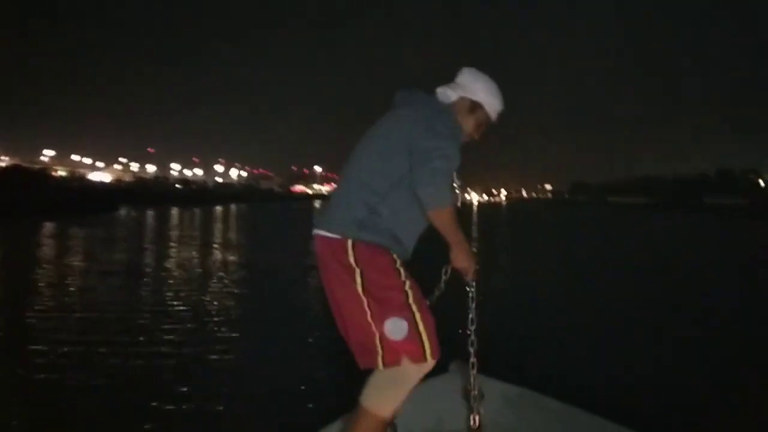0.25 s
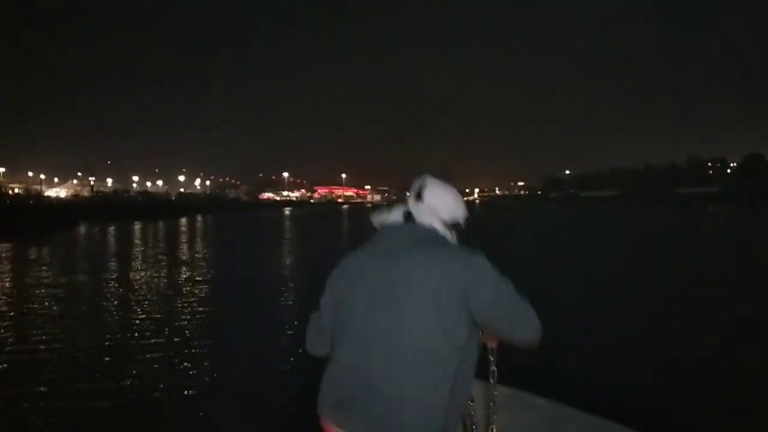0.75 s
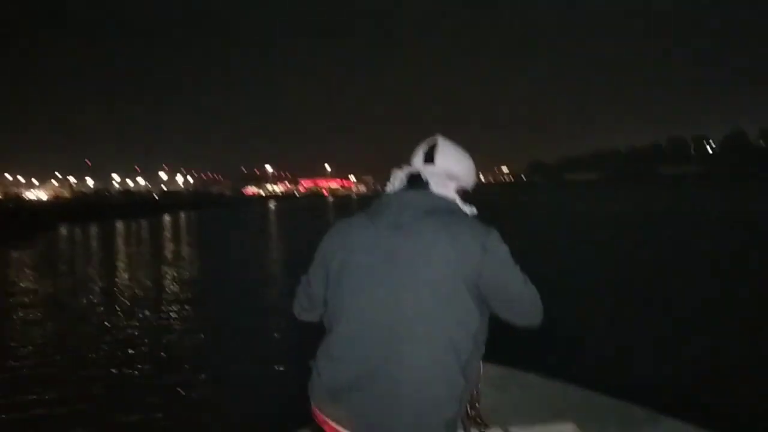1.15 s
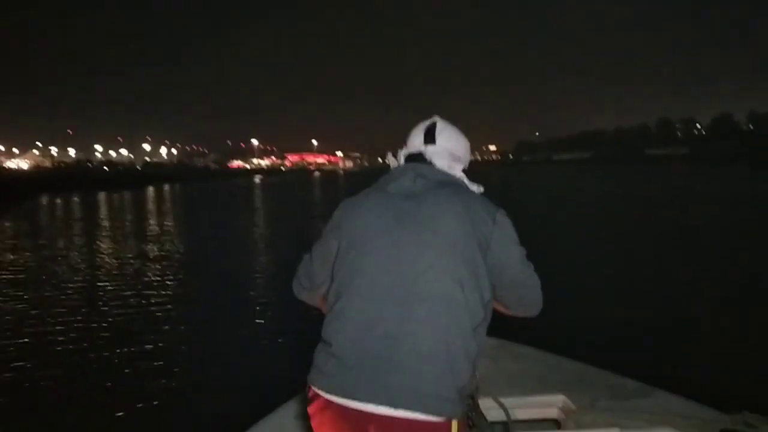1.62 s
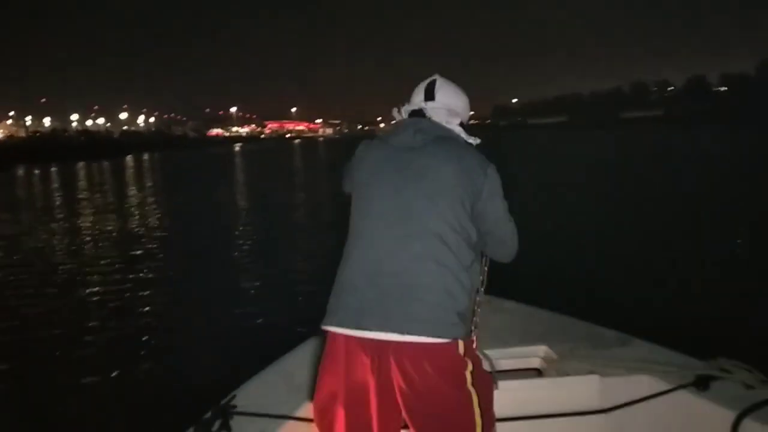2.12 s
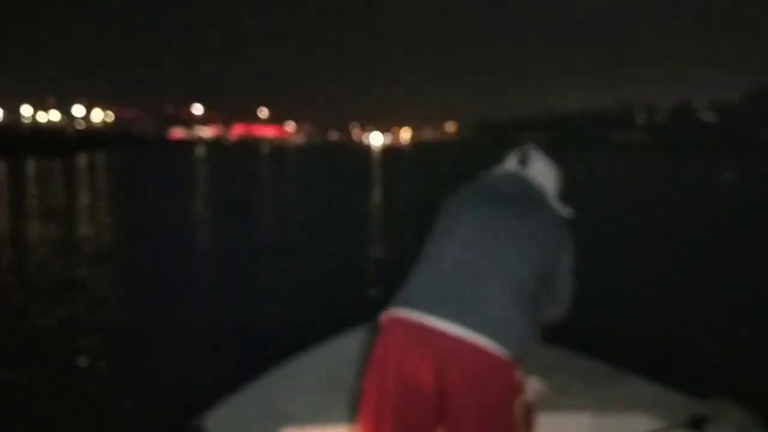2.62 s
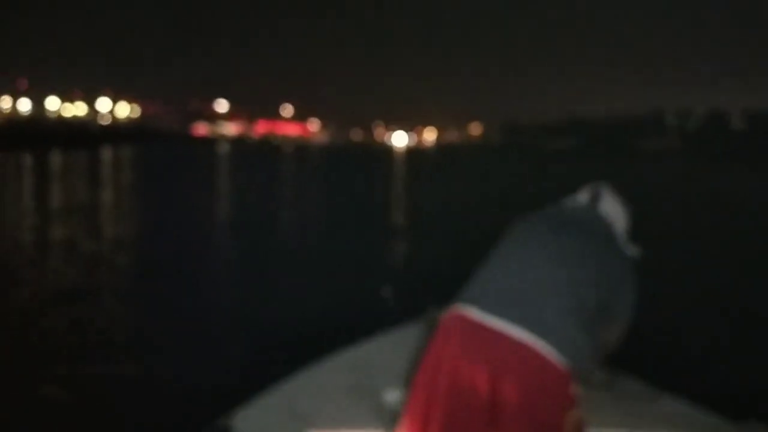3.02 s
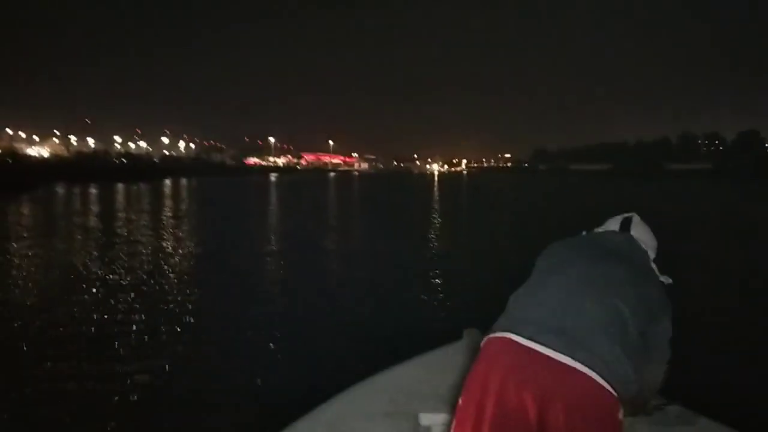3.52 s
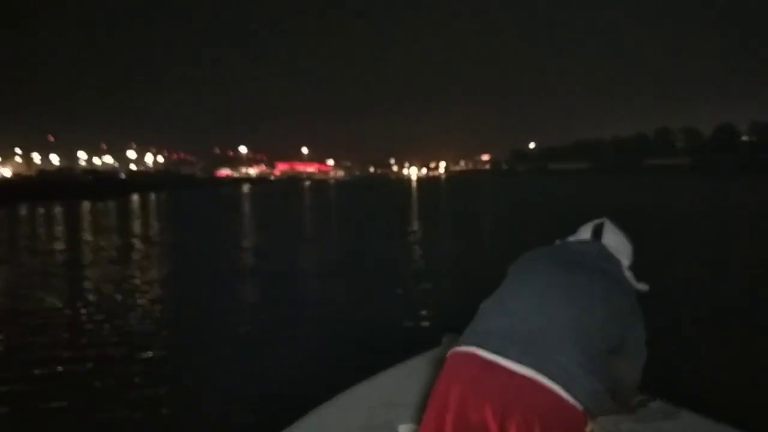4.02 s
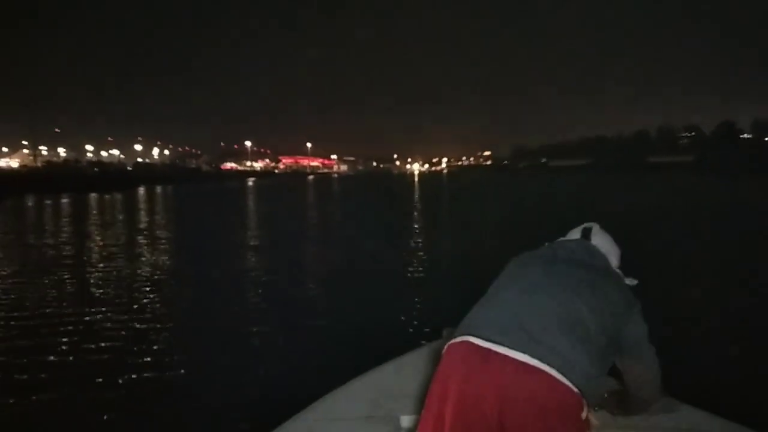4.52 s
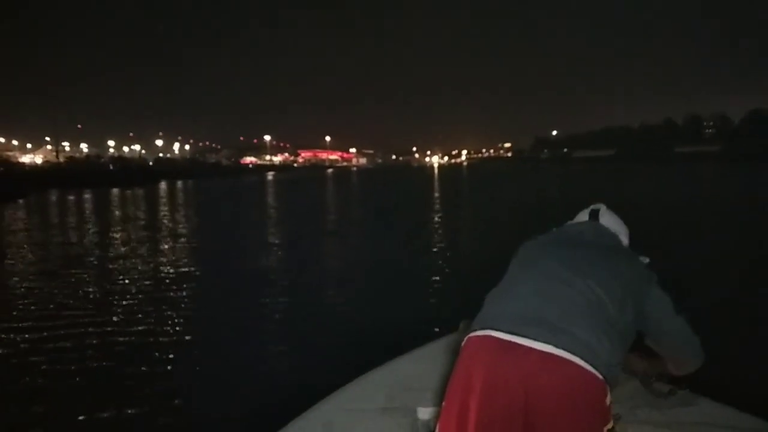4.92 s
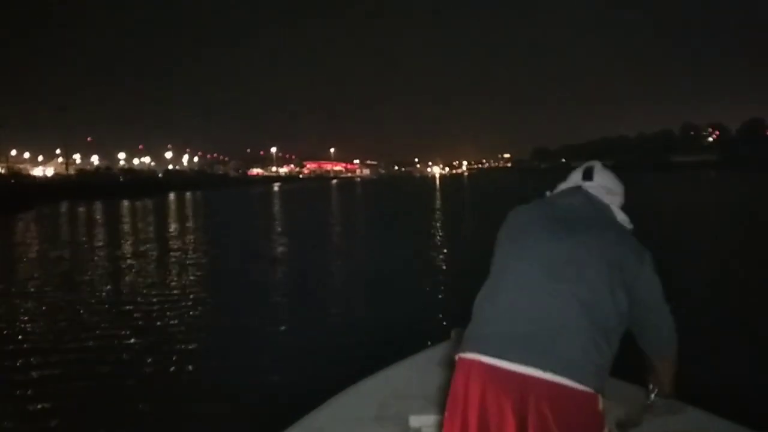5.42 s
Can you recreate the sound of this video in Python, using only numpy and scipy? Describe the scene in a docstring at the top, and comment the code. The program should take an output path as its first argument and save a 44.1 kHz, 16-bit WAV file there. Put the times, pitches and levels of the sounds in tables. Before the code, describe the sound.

Close by on a small boat outdoors, a steel anchor chain is handled on the hollow bow. It starts nearly quiet, then knocks and rattles in short pulls with bright jingles. Midway a length runs rapidly over the edge, then a lull, then the hardest clanks. Low wind gusts thump the handheld stereo microphone above a very faint harbour murmur.

```python
"""Anchor chain over a hollow bow

An anchor chain is hauled by hand over the bow of a small boat. Links knock, rattle and jingle; midway
a length runs freely over the edge. Knocks and rattle are short band-filtered cracks that excite decaying
hull booms; the jingle is ringing modes plus a scrape of noise; the edge run ticks through a noise burst.
Snaps, tones, a sinking scuff and a faint hiss join in. Shaped noise makes the gusts on the microphone
and the faint harbour murmur behind."""
import sys
import numpy as np
from scipy import signal
from scipy.fft import rfft, irfft
from scipy.io import wavfile
from scipy.ndimage import uniform_filter1d

SR = 44100
rng = np.random.default_rng(int(sys.argv[2]) if len(sys.argv) > 2 else 0)


def transcribe(u):
    """Save the signal u as a 16-bit wav file named by the first command-line argument.

    u: samples, shape (n,) or (channels, n), limited to [-1, 1]; the rate is SR.
    q: integer samples, one column per channel.
    """
    v = np.clip(np.atleast_2d(u).T, -1, 1)
    q = np.round(v * 32767).astype(np.int16)
    wavfile.write(sys.argv[1], SR, q)


N = 249253
TIME = np.arange(N) / SR
RING_TIME = TIME[:SR // 4]
RING_HZ = np.fft.rfftfreq(len(RING_TIME), 1 / SR)

# All table levels are relative; trims in the functions and in scene() set the final level. Side columns are
# left minus right; density_db is a noise spectrum per Hz. Links striking the deck, and one low crack at 2.024
# s: start_s, level_db, pitch_hz
KNOCKS = [(0.013, -24, 1340), (0.178, -61, 1900), (0.207, -49, 1878), (0.461, -16, 940), (0.492, -22, 1174),
          (0.514, -23, 1280), (0.569, -20.5, 1630), (0.649, -10, 1890), (0.7352, -13, 1600),
          (0.798, -14, 1870), (1.0234, -28.5, 1567), (1.2205, -17, 1365), (1.2427, -11.5, 1270),
          (1.3021, -9, 1600), (1.315, -6.5, 1020), (1.345, -11.5, 1072), (1.4522, -19.5, 1414),
          (1.763, -53, 1700), (1.894, -29.5, 1410), (1.94, -34, 1497), (2.024, -25, 875),
          (2.1542, -13.5, 1400), (2.5894, -7.5, 1330), (2.627, -16, 1323), (2.6434, -8, 1562),
          (2.705, -7.5, 1330), (3.1403, -15.5, 1300), (3.244, -6.5, 1500), (3.3048, -14, 1512),
          (3.6021, -33, 1620), (3.6792, -34, 1535), (3.8278, -36, 1653), (4.0149, -28.5, 1258),
          (4.3476, -10.5, 1211), (4.6492, -10, 981), (4.7604, -18, 1071), (4.869, -10, 1259),
          (4.8921, -3.5, 1360), (4.915, -3.5, 1431), (4.932, -18.5, 1283), (5.022, -6, 1480),
          (5.031, -2, 1431), (5.065, -9, 1640), (5.075, -7.5, 1641), (5.126, -17, 1700), (5.285, -24, 930),
          (5.293, -16.5, 620), (5.3221, -14.5, 624), (5.345, -15, 650), (5.3688, -8.5, 769),
          (5.411, -10.5, 1301), (5.428, -8, 1159), (5.44, -13.5, 940), (5.493, -17, 1270),
          (5.51, -10, 1134)]
# A length of chain slides over the deck: start_s, length_s, first_level_db, last_level_db
SLIDES = [(0.479, 0.18, -31, -27), (0.642, 0.22, -22.5, -23.5), (0.951, 0.095, -49, -46),
          (1.109, 0.057, -41.5, -31.5), (1.18, 0.096, -26, -20), (1.297, 0.079, -21, -17),
          (1.436, 0.091, -26.5, -35), (1.886, 0.05, -31, -49), (1.985, 0.03, -21, -50),
          (2.154, 0.02, -6, -30.5), (2.589, 0.13, -11, -11), (2.739, 0.41, -15, -17),
          (3.19, 0.15, -24.5, -21), (3.601, 0.11, -37.5, -47), (3.826, 0.025, -45.5, -37.5),
          (4.25, 0.029, -44.5, -40), (4.3, 0.35, -19, -23.5), (4.648, 0.2, -16, -23),
          (4.872, 0.072, -28, -18), (5.022, 0.17, -13, -22), (5.239, 0.1437, -34.5, -22),
          (5.407, 0.034, -18.5, -17), (5.487, 0.047, -18.5, -23)]
# Colour of a link on the deck: frequency_hz, density_db
DECK_COLOUR = [(100, -14), (270, -1.5), (400, 2), (520, -2), (780, 0), (1050, 1), (1350, 3), (2000, -3),
               (2500, -10), (3100, -20), (4500, -38), (6000, -32.5), (10000, -39), (15000, -71)]
# Ringing panels of the hull: frequency_hz, level_db, t60_s
HULL_PANELS = [(280, -17.5, 0.23), (680, -17, 0.053), (803, -22.5, 0.047), (930, -17, 0.11),
               (1055, -20, 0.12), (1240, -15, 0.069), (1330, -20, 0.17), (1490, -16.5, 0.039),
               (1851, -11, 0.027), (1993, -15.5, 0.08), (2357, -16.5, 0.08)]
# Chain scuffs into the hollow of the bow, ever deeper: time_s, pitch_hz, level_db
SCUFF = [(5.26, 650, -61), (5.29, 601.7, -29.5), (5.38, 398.3, -20.5), (5.46, 214, -21.5),
         (5.52, 190.8, -61)]
# A clink sets the hanging links jingling: start_s, level_db, length_s
SHAKES = [(0.004, -61.5, 0.026), (0.198, -55.5, 0.017), (0.22, -56, 0.0062), (0.292, -53, 0.0052),
          (0.524, -35.5, 0.14), (0.652, -24, 0.17), (0.847, -35, 0.05), (0.95, -27.5, 0.0048),
          (1.114, -37.5, 0.06), (1.22, -40, 0.046), (1.305, -23.5, 0.058), (1.455, -28.5, 0.037),
          (1.884, -40.5, 0.025), (1.986, -36.5, 0.017), (2.156, -37.5, 0.02), (2.179, -27, 0.022),
          (2.463, -45.5, 0.017), (2.601, -19.5, 0.69), (3.452, -51.5, 0.012), (3.5976, -28, 0.018),
          (4.304, -41, 0.022), (4.335, -43, 0.018), (4.41, -33, 0.032), (4.511, -32.5, 0.031),
          (4.655, -22, 0.085), (4.82, -31.5, 0.04), (4.895, -23, 0.097), (5.026, -21, 0.11),
          (5.2788, -28, 0.014), (5.42, -23.5, 0.025), (5.508, -24.5, 0.06)]
# Modes of a steel link: frequency_hz, level_db, t60_s, side_db
LINK_MODES = [(4200, -22, .05, 1), (7200, -12, .04, 26.5), (7600, -29, .04, 21.5),
              (11270, -2.5, 0.043, -14), (11030, -1, 0.089, 15), (11540, -4.5, 0.16, 0.5),
              (12200, -13, 0.14, 2.5)]
# Scrape of steel on steel: frequency_hz, density_db
SCRAPE_COLOUR = [(2500, 11.5), (4500, 3.5), (6200, 4), (7600, 13), (9500, 2), (11200, 13), (12800, 0.5),
                 (14000, -6.5), (15500, -30)]
# Stereo place of that scrape: frequency_hz, side_db
SCRAPE_SIDE = [(4500, 18), (7300, 34), (9000, 38), (10500, 11), (14000, 1)]
# Dry snaps of the chain coming taut: start_s, level_db
SNAPS = [(1.5247, -18), (1.5387, -13), (1.5945, -30.5), (2.0062, -27.5), (2.495, -31.5)]
# Colour of the snaps: frequency_hz, density_db
SNAP_COLOUR = [(500, -34), (1100, -0.5), (2000, -1.5), (3200, 6.5), (5000, -3.5), (9000, -7.5),
               (15000, -14)]
# Colour of the hiss while the chain is taut: frequency_hz, density_db
HISS_COLOUR = [(3000, -21), (5500, -6), (7600, 0), (9000, -10), (11000, -1), (15000, -29)]
# Chain running fast over the edge of the bow: time_s, level_db
RUN = [(2.58, -91), (2.6, -28.5), (2.75, -21), (2.8, -17.5), (2.93, -15), (3.05, -17), (3.09, -25),
       (3.3, -27.5), (3.48, -83)]
# Colour of that edge: frequency_hz, density_db
EDGE_COLOUR = [(120, -10), (320, 3.5), (550, -16.5), (800, -11), (1100, -35), (1480, 1), (1750, -7),
               (2100, 0.5), (2500, -3.5), (3100, -23), (3900, -15.5), (4600, -13), (5400, -21.5),
               (6500, -39), (15000, -51.5)]
# A fitting or a hull panel ringing on its own: start_s, pitch_hz, level_db, t60_s
PINGS = [(0.028, 394, -20.5, 0.019), (0.15, 525, -39.5, 0.099), (0.291, 1550, -47, 0.062),
         (1.538, 1050, -24.5, 0.033), (1.762, 5530, -47, 0.086), (1.762, 7230, -45, 0.055),
         (4.25, 592, -35, 0.12), (5.09, 1336, -15, 0.18), (5.135, 285.9, -20, 0.28),
         (5.322, 648, -11, 0.039), (5.344, 680, -14, 0.05), (5.369, 620, -10, 0.019),
         (5.379, 170.5, -23, 0.25), (5.383, 833, -14.5, 0.064), (5.457, 280, -20, 0.11)]
# Where the chain is heard: time_s, rattle_side_db, jingle_side_db
PLACE = [(0.0, -2.5, 13), (0.35, 1.5, -24), (1.45, 1, -17), (1.95, 1.5, -12), (2.58, -2.5, -17.5),
         (2.76, 3.5, -9.5), (2.96, 9.5, -7), (3.33, 4, -12), (4.67, 0.5, -11.5), (5.2, 1, -0.5),
         (5.65, 1.5, -11)]
# Breeze on the microphone, rising and falling: time_s, level_db
BREEZE = [(0.0, -42), (0.35, -48), (0.6, -26), (1.0, -39.5), (1.3, -38), (1.8, -39), (2.52, -39),
          (2.64, -30), (3.2, -29), (3.6, -42), (4.25, -46), (4.6, -41), (5.65, -40.5)]
# Gusts on the microphone: start_s, length_s, level_db
GUSTS = [(0.021, 0.014, -27), (0.262, 0.016, -36.5), (0.559, 0.059, -12), (0.625, 0.1, -15.5),
         (0.775, 0.037, -12.5), (0.84, 0.033, -24), (1.097, 0.04, -27.5), (1.241, 0.11, -12.5),
         (1.37, 0.067, -11.5), (1.552, 0.03, -38), (1.667, 0.022, -19), (1.771, 0.015, -30),
         (1.906, 0.058, -9), (1.999, 0.034, -9), (2.117, 0.015, -13.5), (2.184, 0.024, -15),
         (2.233, 0.011, -8.5), (2.282, 0.047, -14), (2.348, 0.016, -17.5), (2.924, 0.011, -19),
         (3.066, 0.038, -18.5), (3.257, 0.025, -16), (3.366, 0.019, -17), (3.426, 0.02, -23.5),
         (3.698, 0.013, -28), (3.896, 0.011, -20.5), (4.622, 0.023, -22.5), (5.38, 0.0972, -33.5)]
# Colour of the wind: frequency_hz, density_db
WIND_COLOUR = [(20, -5.5), (50, -0.5), (120, -2.5), (220, -7), (350, -12.5), (480, -24.5), (700, -53.5),
               (1500, -66.5), (15000, -130)]
# Colour of the harbour murmur: frequency_hz, density_db
HARBOUR_COLOUR = [(30, 7.5), (120, 4.5), (300, -2), (700, -8.5), (1500, -21.5), (2200, -33.5),
                  (3500, -58.5), (8000, -42.5), (15000, -70.5)]

SLIDE_ATTACK_S, SLIDE_T60_S = 0.01, 0.12
SLIDE_COAST = 0.25   # share of the slide's length added to its release t60
SETTLE_DB, SETTLE_LENGTHS = -17, 1.6   # softer settling; its t60 in lengths of the slide
SLACK_DB, SLACK_WANDER_DB = -61, 5   # links stir in the hands between pulls
LURCH_DB, LURCHES_PER_S = 2.0, 45   # the chain catches and slips link by link
CHATTER_DB, CHATTER_S, CHATTER_T60_S = -15, 0.012, 0.1   # neighbours chatter after a knock: level, rise, decay
SLIDE_JINGLE_DB = -20   # jingle of a sliding chain, relative to its rattle
SHAKE_BUILD = 0.23   # attack as a share of the shake's length
SHAKE_T60_S, SHAKE_COAST = 0.09, 0.25   # release, and the share of the length added to it
SWING_DB, SWING_T60_S = -32, 0.2   # the links swing on faintly
HISS_START_S, HISS_LENGTH_S, HISS_DB = 1.4, 1, -62.5
GUST_ATTACK_S, GUST_T60_S = 0.0072, 0.066
WAKE_DB, WAKE_LENGTHS = -9, 6.9   # trailing eddies; their t60 in lengths of the gust
CUTOFF_HZ = 15200


def knocks(spots, knock_db, boom_db, typical_gap_s, rebound_db, hardening, drying):
    """A link lands on one end, then the other, and shakes the hull; strong blows are brighter and drier."""
    s, level_db, hz = np.transpose(KNOCKS)
    size = from_db(level_db + knock_db)
    second_s = s + typical_gap_s * rng.uniform(0.614, 1.474, len(s))
    excess_db = level_db - level_db.mean()
    hard_db = hardening * excess_db   # a stronger blow makes a shorter contact
    both_s = np.r_[s, second_s]
    both_sizes = np.r_[size, size * from_db(rebound_db)]
    both_hard_db = np.r_[hard_db + 4, hard_db]
    crack = contact_force(both_s, both_sizes, np.r_[hz, hz],
                          focus_db=21, focus_octaves=0.87, scatter_db=2.5, hard_db=both_hard_db)
    push_size = size * from_db(-drying * excess_db)
    push = contact_force(s, push_size, hz, focus_db=7.0, focus_octaves=0.64, scatter_db=4, hard_db=hard_db)
    return crack + from_db(boom_db) * shake_hull(push, spots)


def rattle(slide, spots, drag_db, direct_db, usual_hz):
    """A stream of small touches as chain slides over the deck; some land harder and brighter than others."""
    s, size = contacts(to_db(slide) + drag_db, busy_per_s=600, spread_db=3.5)
    hz = usual_hz * 2 ** rng.normal(0, 0.25, len(s))
    hard_db = rng.normal(0.6, 1.6, len(s))
    force = contact_force(s, size, hz, focus_db=8.5, focus_octaves=0.11, scatter_db=4.5, hard_db=hard_db)
    return from_db(direct_db) * force + shake_hull(force, spots)


def sliding():
    """Strength of the rattle: slides change pace evenly, lurch and settle; every knock adds chatter."""
    power = from_db(SLACK_DB + SLACK_WANDER_DB * wander(per_s=25)) ** 2
    for s, length, first_db, last_db in SLIDES:
        pace = from_db(np.interp(TIME, [s, s + length], [first_db, last_db]))
        release = SLIDE_T60_S + SLIDE_COAST * length
        power += (pace * burst(s, length, SLIDE_ATTACK_S, release, SETTLE_DB, SETTLE_LENGTHS * length)) ** 2
    knock_s, knock_db, _ = np.transpose(KNOCKS)
    chatter = np.minimum(RING_TIME / CHATTER_S, 1) * dying(CHATTER_T60_S)
    chatter_power = (chatter[None] / chatter.max()) ** 2
    power += np.abs(excite(clicks(knock_s, from_db(knock_db + CHATTER_DB) ** 2), chatter_power)[0])
    return np.sqrt(power) * from_db(LURCH_DB * wander(LURCHES_PER_S))


def contact_force(s, size, hz, focus_db, focus_octaves, scatter_db, hard_db=0):
    """Each touch is a short crack with a resonance around its own pitch; hard ones carry more treble."""
    edges = np.geomspace(90, 15000, num=23)
    centres = np.sqrt(edges[1:] * edges[:-1])
    resonance = np.exp(-(np.log2(centres / hz[:, None]) / focus_octaves) ** 2)
    treble = np.outer(hard_db, np.clip(np.log2(centres / 2000), 0, 1))
    scatter = scatter_db * rng.standard_normal(resonance.shape)
    gains = from_db(at_hz(DECK_COLOUR, centres) + focus_db * resonance + treble + scatter)
    energy = gains ** 2 @ np.diff(edges) * 2 / SR
    gains *= (size / np.sqrt(energy))[:, None] * rng.choice([-1, 1], gains.shape)
    # short waves reach the two ports out of step more often than long ones
    flipped = rng.random(gains.shape) < np.minimum(centres / 9000, .4)
    right = gains * np.where(flipped, -1, 1)
    out = np.zeros((2, N))
    for band, left_sizes, right_sizes in zip(zip(edges, edges[1:]), gains.T, right.T):
        train = np.array([clicks(s, left_sizes), clicks(s, right_sizes)])
        sos = signal.butter(2, band, "band", fs=SR, output="sos")
        out += signal.sosfilt(sos, train + 1e-18)   # the tiny offset avoids slow denormal numbers
    return out


def hull_boom(clack_t60, thud_t60, thud_db, panel_db):
    """The hollow bow answers with a dense clack, a softer and shorter thud and a few ringing panels."""
    size = len(RING_TIME)
    out = unit_energy(stereo_noise(size, alike=0.63) * dying(clack_t60))
    out += from_db(thud_db) * unit_energy(stereo_noise(size, alike=0.96) * dying(thud_t60))
    for hz, level_db, t60 in HULL_PANELS:
        phase = rng.normal(0, 1.0, (2, 1))
        panel = np.sin(2 * np.pi * hz * RING_TIME + phase) * dying(t60)
        out += from_db(level_db + panel_db) * unit_energy(panel)
    return unit_energy(out)


def shake_hull(force, spots, spots_per_s=9.0):
    """The chain moves round a cycle of spots on the bow, and each spot booms in its own way."""
    count = len(spots)
    out = 0
    for k, boom in enumerate(spots):
        distance = np.abs((TIME * spots_per_s - k + count / 2) % count - count / 2)
        out = out + excite(force * np.sqrt(np.maximum(1 - distance, 0)), boom)
    return out


def scuff(scuff_db, focus_db):
    """Dull touches in a hollow whose pitch sinks."""
    s, size = contacts(curve(SCUFF, TIME)[1] + scuff_db, busy_per_s=480, spread_db=5)
    during = (s > SCUFF[0][0]) & (s < SCUFF[-1][0])
    hz = curve(SCUFF, s)[0]
    return contact_force(s, size * during, hz, focus_db=focus_db, focus_octaves=1.0, scatter_db=1)


def jingle(slide, clink_db, shake_db, count=16):
    """Touches of steel on steel are dealt at random among many links, each ringing in its own way."""
    clink_s, level_db, _ = np.transpose(SHAKES)
    shake_s, shake_size = contacts(to_db(shaking(slide)) + shake_db, busy_per_s=700, spread_db=0.5)
    s = np.r_[clink_s, shake_s]
    size = np.r_[from_db(level_db + clink_db), shake_size]
    link = rng.integers(0, count, len(s))
    out = np.zeros((2, N))
    for k in range(count):
        response = link_response(detune=0.00287, scrape_db=-2, scrape_t60=0.033)
        out += excite(clicks(s, size * (link == k)), response)
    return out


def shaking(slide):
    """Strength of the jingle: it follows the sliding, and builds up and dies after each shake."""
    power = (from_db(SLIDE_JINGLE_DB) * slide) ** 2
    for s, level_db, length in SHAKES:
        release = SHAKE_T60_S + SHAKE_COAST * length
        shape = burst(s, length, SHAKE_BUILD * length, release, SWING_DB, SWING_T60_S)
        power += (from_db(level_db) * shape) ** 2
    return np.sqrt(power)


def link_response(detune, scrape_db, scrape_t60):
    """One link rings slightly off the pitch of its neighbours, along with a brief scrape."""
    hz, level_db, t60, side_db = np.transpose(LINK_MODES)
    hz = hz * (1 + detune * rng.standard_normal(len(hz)))
    phase = rng.uniform(0, 2 * np.pi, (2, len(hz), 1))
    modes = np.sin(2 * np.pi * hz[:, None] * RING_TIME + phase) * dying(t60[:, None])
    ring = np.sum(modes * (from_db(level_db) * pan(side_db))[..., None], axis=1)
    grit = rfft(stereo_noise(len(RING_TIME), alike=0.052))
    grit = grit * from_db(at_hz(SCRAPE_COLOUR, RING_HZ)) * pan(at_hz(SCRAPE_SIDE, RING_HZ))
    scrape = irfft(grit, len(RING_TIME)) * dying(scrape_t60)
    return unit_energy(ring) + from_db(scrape_db) * scrape / np.sqrt(np.sum(scrape ** 2) / 2)


def run_over_edge(run_db, t60, side_db):
    """Links tick over the hard edge in quick succession, each tick a short coloured burst."""
    s, size = contacts(curve(RUN, TIME)[0] + run_db, busy_per_s=500, spread_db=0.5)
    spectrum = rfft(stereo_noise(len(RING_TIME), alike=0.037)) * from_db(at_hz(EDGE_COLOUR, RING_HZ))
    tick = unit_energy(irfft(spectrum, len(RING_TIME)) * dying(t60))
    return excite(clicks(s, size * rng.choice([-1, 1], len(s))), tick) * pan(side_db)[:, None]


def snaps(snap_db, t60):
    """Links jerk into place under load, too tight to ring: brief decays of coloured noise."""
    s, level_db = np.transpose(SNAPS)
    envelope = excite(clicks(s, from_db(level_db + snap_db)), dying(t60)[None])
    return envelope * coloured_noise(SNAP_COLOUR, alike=1.0)


def hiss(fade_s, flicker_db):
    """A thin, flickering noise that fades in and out while the chain is taut."""
    since_start, until_end = TIME - HISS_START_S, HISS_START_S + HISS_LENGTH_S - TIME
    gate = np.clip(np.minimum(since_start, until_end) / fade_s, 0, 1)
    return gate * from_db(HISS_DB + flicker_db * wander(per_s=30)) * coloured_noise(HISS_COLOUR, alike=0.24)


def pings(ping_db):
    """A fitting or a panel rings alone as a single damped tone."""
    out = np.zeros((2, N))
    for s, hz, level_db, t60 in PINGS:
        tone = np.sin(2 * np.pi * hz * RING_TIME) * dying(t60)
        out += excite(clicks(np.array([s]), from_db([level_db + ping_db])), tone[None])
    return out


def wind(breeze_db, gust_db):
    """Lumpy low turbulence, nearly separate at each microphone port: gusts over a breeze."""
    power = from_db(curve(BREEZE, TIME)[0] + breeze_db) ** 2
    for s, length, level_db in GUSTS:
        shape = burst(s, length, GUST_ATTACK_S, GUST_T60_S, WAKE_DB, WAKE_LENGTHS * length)
        power += (from_db(level_db + gust_db) * shape) ** 2
    return np.sqrt(power) * coloured_noise(WIND_COLOUR, alike=0.078)


def harbour(level_db):
    """The distant murmur is steady noise, heaviest in the lows."""
    return from_db(level_db) * coloured_noise(HARBOUR_COLOUR, alike=0.18)


def contacts(level_db, busy_per_s, spread_db):
    """Random touches (times, sizes) of a given power; a livelier chain touches both oftener and harder."""
    per_s = busy_per_s * from_db((level_db - level_db.max()) / 4)
    at = np.flatnonzero(rng.random(N) < per_s / SR)
    sizes = from_db(spread_db * np.clip(rng.standard_normal(N)[at], -2, 2))
    sizes /= np.sqrt(uniform_filter1d(sizes ** 2, size=15))   # even power across neighbouring touches
    return at / SR, sizes * from_db(level_db[at]) * np.sqrt(SR / per_s[at])


def burst(s, length, attack, t60, tail_db, tail_t60):
    """Attack, hold and release; a softer layer with its own decay takes over wherever it is the louder."""
    after = np.maximum(TIME - s - length, 0) * np.log(1000)
    release = np.maximum(np.exp(-after / t60), from_db(tail_db) * np.exp(-after / tail_t60))
    return np.clip((TIME - s) / attack, 0, 1) * release


def wander(per_s):
    """Slow chance with a spread near one: straight lines between random points."""
    steps = rng.standard_normal(1000)
    return np.interp(TIME * per_s, np.arange(len(steps)), steps)


def dying(t60):
    """Envelope of a free decay, down 60 dB after t60 seconds."""
    return np.exp(-np.log(1000) * RING_TIME / t60)


def clicks(s, sizes):
    """A train of impulses at times s."""
    return np.bincount(np.clip(s * SR, 0, N - 1).astype(int), sizes, N)


def excite(train, response):
    """Every impulse sets off the response."""
    return signal.oaconvolve(np.atleast_2d(train), response, axes=-1)[:, :N]


def stereo_noise(size, alike):
    """Two white noises with a shared part."""
    shared, *own = rng.standard_normal((3, size))
    alike = np.clip(alike, 0, 1)
    return np.sqrt(alike) * shared + np.sqrt(1 - alike) * np.array(own)


def coloured_noise(spectrum, alike):
    """Steady stereo noise of a given colour, rms 1."""
    colour = from_db(at_hz(spectrum, np.fft.rfftfreq(N, 1 / SR)))
    x = irfft(rfft(stereo_noise(N, alike)) * colour, N)
    return x / x.std()


def pan(side_db):
    """Left and right gains of constant power."""
    gains = from_db(np.array([side_db, -side_db]) / 2)
    return gains / np.sqrt(np.mean(gains ** 2, axis=0))


def curve(rows, s):
    """The columns of a curve, read at times s."""
    times, *columns = np.transpose(rows)
    return [np.interp(s, times, c) for c in columns]


def at_hz(points, hz):
    """A spectrum read on a log-frequency axis."""
    known_hz, values = np.transpose(points)
    return np.interp(np.log(np.maximum(hz, 1)), np.log(known_hz), values)


def unit_energy(x):
    """Scale a response to an energy of one per channel."""
    return x / np.sqrt(np.sum(x ** 2, axis=-1, keepdims=True))


def from_db(db):
    """Decibels to gain."""
    return 10 ** (np.asarray(db) / 20)


def to_db(gain):
    """Gain to decibels."""
    return 20 * np.log10(gain + 1e-9)


def scene(count=5):
    """Chain on the bow, wind at the microphone, harbour behind."""
    rattle_side, jingle_side = curve(PLACE, TIME)
    slide = sliding()
    spots = [hull_boom(clack_t60=0.098, thud_t60=0.021, thud_db=-7.0, panel_db=-7.5) for _ in range(count)]
    deck = knocks(spots, knock_db=19.5, boom_db=2.5, typical_gap_s=0.003043, rebound_db=-3.5,
                  hardening=0.98, drying=0.29)
    deck += rattle(slide, spots, drag_db=-1.5, direct_db=-6.5, usual_hz=1247)
    deck += scuff(scuff_db=1, focus_db=28)
    links = jingle(slide, clink_db=23, shake_db=-1.5) * pan(jingle_side)
    taut = snaps(snap_db=-4.5, t60=0.015) + hiss(fade_s=0.015, flicker_db=4.0)
    chain = deck * pan(rattle_side) + links + taut * pan(side_db=8.5)[:, None]
    chain += run_over_edge(run_db=0.5, t60=0.031, side_db=5.5) + pings(ping_db=4.5)
    return chain + wind(breeze_db=0.5, gust_db=3.0) + harbour(level_db=-43.0)


def record(dry):
    """The tallest peaks overload the input and are rounded off; a steep low-pass cuts the top."""
    clipped = dry / (1 + (dry / .98) ** 4) ** .25
    low_pass = signal.ellip(10, .1, 70, CUTOFF_HZ, fs=SR, output="sos")
    return signal.sosfilt(low_pass, clipped)


dry = scene()
out = record(dry)
transcribe(out)
```